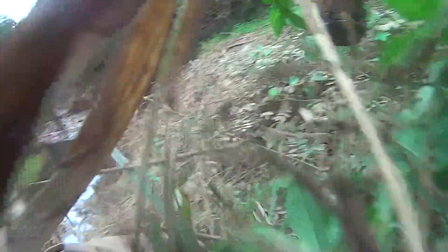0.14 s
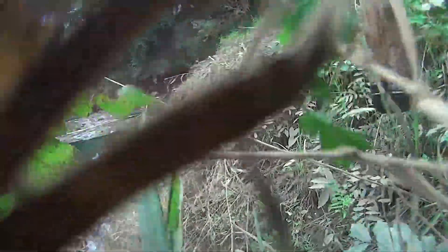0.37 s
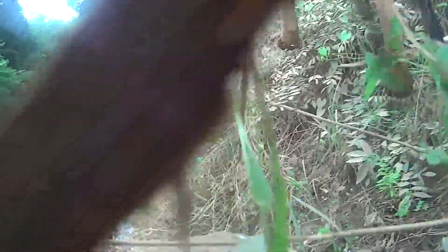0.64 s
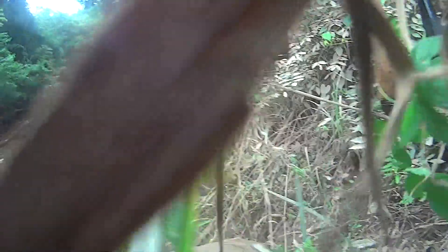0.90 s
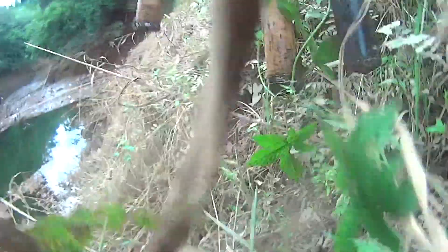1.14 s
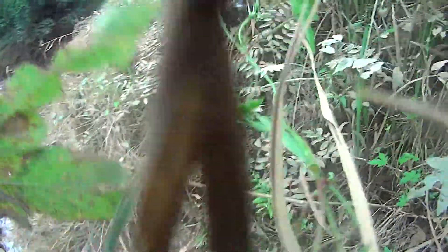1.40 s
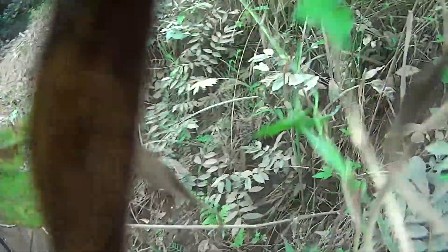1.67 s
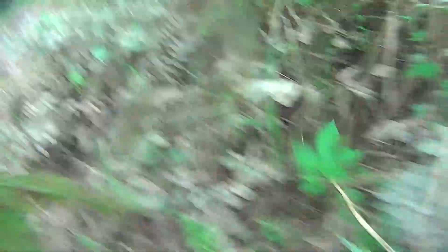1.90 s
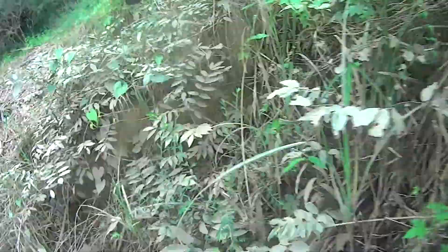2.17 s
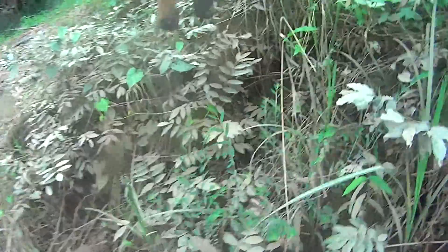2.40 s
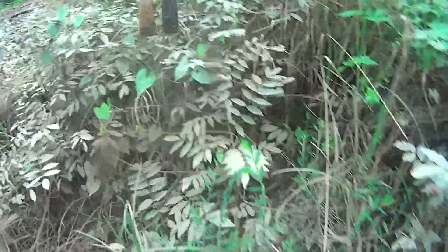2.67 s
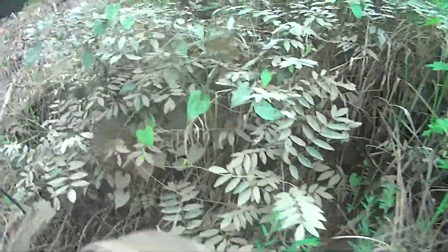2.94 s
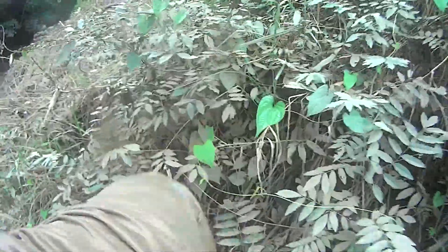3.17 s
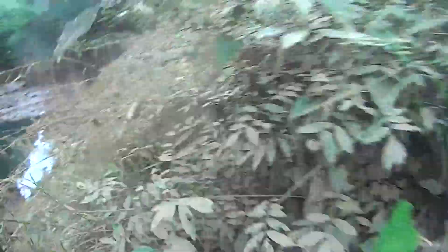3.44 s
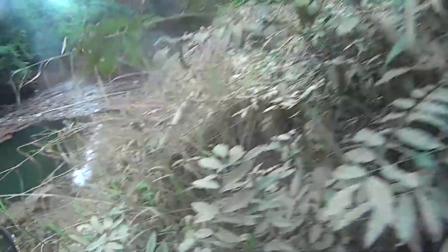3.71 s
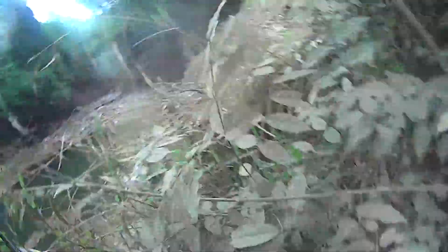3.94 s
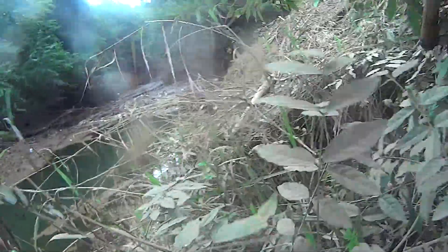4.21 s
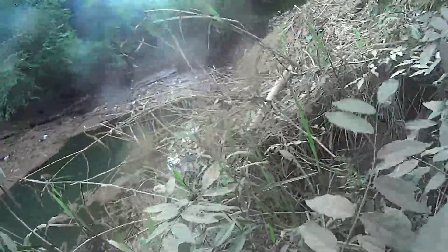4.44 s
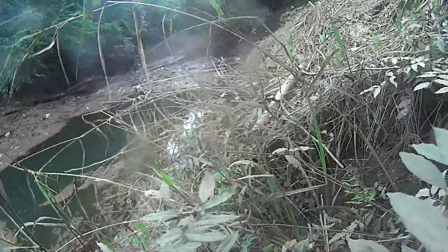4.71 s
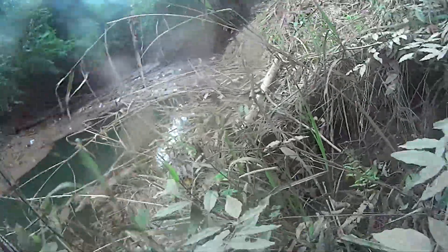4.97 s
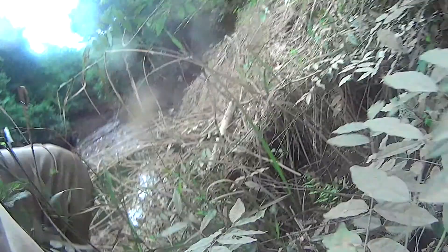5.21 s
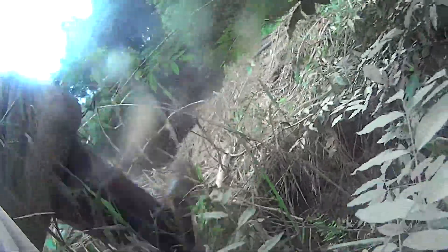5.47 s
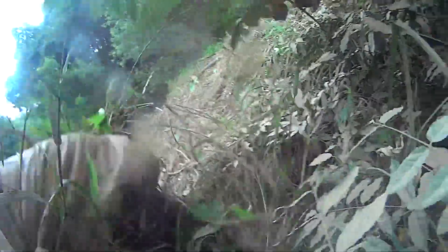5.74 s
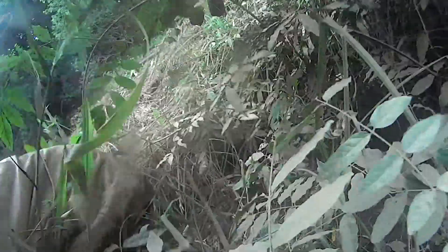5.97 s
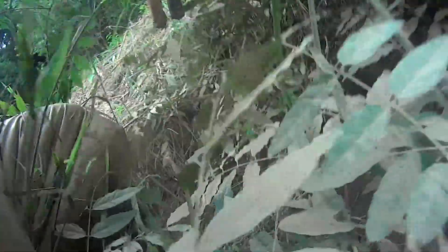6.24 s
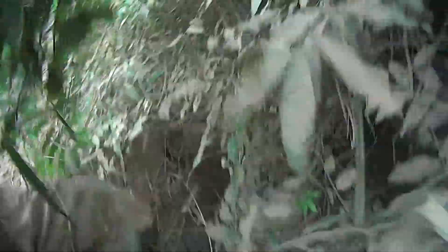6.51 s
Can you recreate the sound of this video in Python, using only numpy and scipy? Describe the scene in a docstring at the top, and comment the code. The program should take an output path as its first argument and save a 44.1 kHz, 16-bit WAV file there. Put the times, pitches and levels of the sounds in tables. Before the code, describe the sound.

Harsh stick-slip scratching of dry stems and leaves directly on a small camera's plastic case, in stereo and slightly overloaded, with cracks and low body jolts. After about three seconds there is a lull, a short burst of scrapes, then mostly quiet microphone hiss with light leaf brushing, isolated dull taps and a thin distant insect. Finally a few crisp scrapes and heavy woody knocks close to the microphones.

```python
"""Dry stalks and leaves drag over the plastic housing of a body-worn camera pushed through undergrowth.
From the start stick-slip jerks drive noise through the housing's modes, over bass thumps of the body's
jolts and a steady hiss. Single snaps strike the modes from half a second on. As the scraping thins near
3 s a faint insect buzzes as a narrow noise band; from 3.5 s twigs knock as short decaying sines.
Each mode reaches the two microphones with its own balance and phase."""
import sys
import numpy as np
from scipy import signal
from scipy.fft import rfft, irfft, next_fast_len
from scipy.io import wavfile
from scipy.ndimage import uniform_filter1d

SR = 44100
rng = np.random.default_rng(int(sys.argv[2]) if len(sys.argv) > 2 else 0)


def master_out(mix):
    """Clip the mix to full scale and print it as 16-bit PCM to the path in sys.argv[1]."""
    frames = np.transpose(np.atleast_2d(mix))
    ceiling = np.clip(frames, -1, 1)
    pcm = np.round(ceiling * 32767).astype(np.int16)
    wavfile.write(sys.argv[1], SR, pcm)


def undo_db(level):
    """Turn decibels back into plain size, where 20 dB means ten times bigger."""
    steps = np.asarray(level, float) / 20
    return 10 ** steps


N = 291940

# housing modes, here and in the functions: pitch_hz, width_hz, level_db, left_over_right_db, left_lead_rad
SHELL_MODES = [(1280, 212, -8, 1, 1.36), (1521, 203, 1.5, -3, 0.17), (1722, 245, -5.5, 1, 0.44)]
BACK_MODES = [(433, 238, 2.5, -1, -1.6), (927, 860, -3.5, 1.5, -1.5)]
PLATE_MODES = [(652, 74, 0, 0, -0.11)]
MOUNT_MODES = [(173, 44, -7, 0.69, -1.8), (223, 77, -1.5, .5, 0.1), (311, 124, -4, 0, -2.5)]


def unit(x):
    """x brought to rms 1 over every eighth of a second."""
    power = uniform_filter1d(x ** 2, SR // 8)
    return x / np.sqrt(power.clip(1e-12))


def curves(rows):
    """One value per sample for each column after the time."""
    s, *columns = np.transpose(rows)
    return [np.interp(np.arange(N) / SR, s, column) for column in columns]


def drift(per_s, depth_db):
    """A slow random gain: per_s random knots a second, joined by straight lines."""
    knots = undo_db(depth_db * rng.standard_normal(200))
    return np.interp(np.arange(N) / SR * per_s, np.arange(200), knots)


def jerks(per_s, spread_db, t60_s):
    """Force envelope of stick-slip: random releases of uneven but bounded size, each dying quickly."""
    draws = rng.random((N // 64, 2))
    waits_s = -np.log(draws[:, 0]) / per_s
    at = (np.cumsum(waits_s) * SR).astype(int)
    sizes = undo_db(-spread_db * np.log(draws[:, 1].clip(.035)))
    force = np.bincount(at.clip(0, N), sizes, N)[:N]
    decay = undo_db(-60 / (t60_s * SR))
    return unit(signal.lfilter([1], [1, -decay], force))


def ring(modes, level_db, slips, glide, taps, own_per_s, apart, puff):
    """Noise under the rubbing force and the taps drive each mode; each microphone hears it at its own phase."""
    size = next_fast_len(N + 8192, True)
    f = np.fft.rfftfreq(size, 1 / SR)
    shapes = []
    for hz, width_hz, db, _, _ in modes:
        resonance = 1j * f * width_hz / (hz * hz - f * f + 1j * f * width_hz)
        shapes.append(undo_db(db) * resonance ** 1.572)
    whole = sum(shapes)
    norm = np.sqrt(np.mean(np.sum(np.abs(shapes) ** 2, 0)))
    level = undo_db(level_db)
    side = np.array([[1], [-1]]) / 2  # left, right

    strike = rfft(taps, size) * norm / np.abs(irfft(whole, size)).max()
    # a snap rattles on for a moment as noise
    after = puff * signal.lfilter([1], [1, -undo_db(-60 / (0.022 * SR))], taps)
    near = level * unit(slips + glide) * rng.standard_normal((2, N))  # rubbing heard separately by each microphone, unrelated left and right
    out = apart * rfft(near, size) * whole
    for shape, (_, _, _, pan_db, lead_rad) in zip(shapes, modes):
        own = jerks(own_per_s, spread_db=2.0, t60_s=0.062)  # each mode is also caught by stalks of its own
        rub = level * unit(slips * (0.09 + own) + glide)
        force = rub * drift(16, depth_db=3.0) + after  # the contact spot wanders
        drive = (rfft(force * rng.standard_normal(N), size) + strike) * shape
        out = out + drive * (undo_db(pan_db * side) * np.exp(1j * lead_rad * side))
    return irfft(out / norm, size)[:, :N]


def rubbing():
    """Pressure and crispness in dB: strokes grip fast, swell or sag and let go; stronger contact sets colour."""
    # strokes of stalks: start_s, length_s, start_pressure_db, swell_to_end_db, crispness_db
    strokes = [(0.0, 0.065, -21, 3.5, 10.5), (0.068, 0.12, -29, 7, 8), (0.138, 0.15, -15.5, -5, 5),
               (0.279, 0.11, -17, -6.5, 3.5), (0.356, 0.11, -18.5, -5, 3), (0.446, 0.068, -14, -8.5, 0.5),
               (0.519, .1, -17.5, 0, 0), (0.621, 0.08, -23, 8, 1.5), (0.696, 0.033, -20, -1.5, -4),
               (0.735, 0.052, -21, -9, -6), (0.782, .085, -49, -11, 3), (0.891, .03, -27.5, -3.5, -3),
               (0.921, 0.026, -18.5, 3.5, 3), (.96, 0.078, -41, 1, -9), (1.022, 0.043, -21.5, -2.5, 1.5),
               (1.077, 0.23, -21, 4.5, 4.5), (1.307, 0.17, -19, 3, -2.5), (1.478, 0.053, -19, -3.5, -4.5),
               (1.541, 0.12, -29, 13.5, 3), (1.671, 0.053, -25, 11.5, 0), (1.73, 0.049, -25, -12, 2),
               (1.76, 0.069, -24, 13.5, 1), (1.838, 0.15, -21.5, 5.5, 1.5), (1.954, .088, -16, 1, -1),
               (2.041, 0.079, -19, 8, -13.5), (2.134, .1, -21, 5.5, -2), (2.252, 0.033, -16.5, 7, -1),
               (2.295, 0.085, -25, 10, 1.5), (2.399, .018, -28.5, 6, -3), (2.43, 0.12, -22.5, 4, 1),
               (2.558, .032, -23.5, 10, 4.5), (2.61, 0.077, -24.5, -1, 2.5), (2.774, 0.11, -25.5, -7, -1.5),
               (3.358, 0.039, -22.5, 0.5, 7), (3.397, .02, -25, -2, -7), (3.417, 0.04, -21.5, 9, 6),
               (3.798, 0.022, -46, -3, -13), (3.842, 0.042, -42.5, 1.5, -11),
               (4.033, 0.071, -39.5, 1.5, -2.5), (5.988, 0.036, -45, 13.5, 7),
               (6.026, 0.041, -30, -7.5, 1.5), (6.078, 0.053, -38, 12, -3.5), (6.14, 0.046, -26.5, -3.5, 3)]
    # light brushing of leaves between the strokes: time_s, pressure_db, crispness_db
    brushing = [(0, -29, 2), (2.66, -44.5, -4.5), (2.71, -60, -13), (2.77, -55, -17), (2.9, -45.5, -4),
                (3.15, -44.5, -7.5), (3.25, -39, -4.5), (3.48, -38, -7), (3.56, -59, -8), (3.76, -54.5, -7),
                (3.8, -44.5, -12), (3.9, -50.5, -4), (3.94, -42, -1), (4.12, -44, -14), (4.2, -49.5, -14),
                (4.41, -60, -2), (4.89, -51.5, -5), (5.26, -38.5, -8.5), (5.45, -45, -6.5), (5.67, -45, 0),
                (5.78, -41, 1.5), (5.89, -42.5, 1.5), (5.97, -44.5, 0), (6.2, -48.5, -11),
                (6.23, -36.5, -9), (6.35, -37.5, -6.5), (6.5, -33.5, -10), (6.62, -43.5, -1.5)]
    grip_s, let_go_db_per_s = 0.002, 1511
    brush_db, brush_crisp_db = curves(brushing)
    power = undo_db(2 * brush_db)
    crisp = brush_crisp_db * power
    for start_s, length_s, db, swell_db, crisp_db in strokes:
        at = round(start_s * SR)
        t = np.arange(round(length_s * SR) + SR // 20) / SR
        swell = swell_db * np.clip(t / length_s, 0, 1)
        release_db = let_go_db_per_s * np.clip(t - length_s, 0, None)
        stroke = (undo_db(db + swell - release_db) * np.clip(t / grip_s, 0, 1)) ** 2
        power[at:at + len(t)] += stroke
        crisp[at:at + len(t)] += crisp_db * stroke
    return 10 * np.log10(power), crisp / power


def body(hz, load_db, follows):
    """Level in dB of a low part tuned near hz: the steady load plus the jolts that lie near its pitch."""
    # steady load of the wearer's body on strap and mount, ahead of each part's scaling: time_s, level_db
    load = [(0, -55), (.25, -40.5), (.75, -40), (.83, -65), (.99, -47), (1.1, -41), (2.1, -36), (2.17, -71),
            (2.37, -55), (2.7, -62), (3.3, -68), (3.55, -64.5), (3.75, -64), (4.2, -59.5), (4.39, -69.5),
            (5.0, -61.5), (5.6, -62.5), (6.62, -50)]
    # jolts of the body: peak_s, peak_db, pitch_hz
    jolts = [(.01, -33, 220), (.16, -38, 199), (.29, -24, 69.6), (.39, -17.5, 138), (.58, -13.5, 125),
             (.68, -23.5, 89.5), (.74, -31, 90), (.92, -36.5, 111), (1.03, -27.5, 122), (1.17, -14.5, 140),
             (1.56, -28.5, 90), (1.67, -23, 55), (1.77, -26.5, 190), (1.83, -22, 130), (1.87, -27.5, 100),
             (1.92, -32, 60), (1.97, -21.5, 149), (2.1, -23, 142), (2.26, -21, 156), (3.37, -54, 220),
             (3.48, -45, 200), (3.56, -55.5, 50), (3.74, -59.5, 45), (3.855, -40, 60), (3.9, -46, 40),
             (4.04, -52, 40), (4.019, -37.5, 210), (4.16, -44.5, 60), (4.43, -53, 220), (5.16, -40.5, 220),
             (5.27, -45.5, 111), (5.42, -48.5, 40), (5.7, -41, 130), (5.77, -49, 199), (5.92, -67, 220),
             (5.95, -45, 49.7), (6.19, -51, 220), (6.42, -33, 180), (6.53, -51, 40.3), (6.61, -36, 220)]
    rise_db_per_s, fall_db_per_s, loss_db_per_octave = 169, 216, 13.5
    t = np.arange(0, N + 64, 64) / SR
    peak_s, peak_db, pitch_hz = np.transpose(jolts)[:, :, None]
    away_db = np.where(t < peak_s, rise_db_per_s * (peak_s - t), fall_db_per_s * (t - peak_s))
    detuned_db = loss_db_per_octave * np.abs(np.log2(pitch_hz / hz))
    jolt_power = undo_db(2 * (peak_db - away_db - detuned_db)).sum(0)
    load_power = undo_db(2 * (follows * curves(load)[0] + load_db))
    return 10 * np.log10(load_power + np.interp(np.arange(N) / SR, t, jolt_power))


def blows():
    """Impulses of the snaps and taps, one row for each group of parts: shell, back, edge, port, mount."""
    # time_s, shell_level_db, then against the shell: brightness_db, weight_db
    snaps = [(0.5515, -9, -6, -10), (0.577, -15, -13, 3.5), (0.598, -40, -5, -8), (0.6287, -13.5, 1.5, -9),
             (0.7036, -15, -9, -15), (0.7496, -10.5, -4.5, -13), (0.8026, -12.5, -10, -32),
             (0.892, -18, -4, -2.5), (0.9077, -23, 3, -17), (0.924, -15, -1.5, 0),
             (1.0266, -8.5, -8.5, -39), (1.074, -12, -10, -21), (1.1096, -14, -5, -22),
             (1.1256, -16, -24, -23), (1.1374, -14.5, 0, -9), (1.1442, -16, -1, -8),
             (1.1581, -13.5, -4, -6), (1.366, -8.5, -25, -14), (1.525, -15, -13.5, -11.5),
             (1.565, -10, -19, -9.5), (1.697, -25, -25, -11), (1.715, -8, -20, -11),
             (1.7887, -11.5, -17, -21.5), (1.811, -21, -21, -14), (1.8946, -5, -24, -30),
             (1.9469, -13, -6, -17), (1.988, -10, -3, -12), (2.0303, -28, -9, -17), (2.074, -7, -28, -28),
             (2.1066, -10, -47, -28), (2.1177, -7, -20, -48), (2.155, -5.5, -21, -45),
             (2.2485, -16, -11, -27), (2.3293, -12.5, 2.5, -19), (2.4021, -22, -12, 1.5),
             (2.4317, -21, -23, -1), (2.6612, -12.5, -7.5, -24.5), (2.729, -38.5, -10, -27),
             (2.7775, -30, 3, -25), (3.3684, -14, -10, -24), (3.4524, -13, -13.5, -21.5),
             (3.6084, -37.5, -26, -20.5), (3.776, -34, -25, -25), (5.2795, -36, -5, -7),
             (5.7596, -24.5, 7, -17), (5.7649, -20.5, -11.5, -21), (5.8115, -30.5, 0, -15.5),
             (5.913, -23.5, -19.5, -24.5), (6.1429, -31, -2.5, -24), (6.1834, -31.5, 1.5, -5),
             (6.226, -21, -15, -12), (6.2355, -30.5, -4.5, -9), (6.2545, -29, -8, -8.5),
             (6.403, -30, -6.5, -7)]
    out = np.zeros((5, N))
    for s, db, bright_db, weight_db in snaps:
        part_db = np.array([0, weight_db, bright_db - 5.0, 1.15 * bright_db - 0.5, weight_db - 5.5])
        out[:, round(s * SR)] = -undo_db(db + part_db)
    return out


def housing():
    """The parts share the jerks; light contact glides, hard contact sticks and slips."""
    # modes of the parts, columns as above
    edge = [(2480, 850, -1, 1.3, 1.88), (2734, 570, -0.5, -0.4, 3.8)]
    rim = [(3164, 200, -0.69, -0.65, 1), (3363, 210, -1.3, .5, 0.096)]
    port = [(4360, 510, -1, -2, 1.5), (5020, 450, 2, -1.5, .3), (5193, 690, -3, -1.5, 0.41)]
    grille = [(5910, 680, -3.5, 2.5, .4), (6840, 1500, -0.5, 4, 2), (7790, 330, -4, -10.5, .3),
              (8530, 87, -2, 2, 2.7), (9010, 640, -4.5, 7.5, 1.9), (10100, 380, -8, -3, 1.7)]
    fastener = [(83, 87, -1.5, 0.72, 0.086), (124, 160, 0.43, 0.61, .2)]
    strap = [(29.3, 10.5, 0, 1.3, .1), (50.3, 59, 0.0039, 0.74, .1)]
    # how the contact lies: time_s, flat_on_wide_faces_db, caught_on_rim_db
    contact = [(0, 9.5, 7), (.11, -3.5, 0), (.44, 7, 1.5), (.55, 2.5, -1), (.66, -0.5, 4.5), (.8, 8, 4.5),
               (.93, 7, -0.5), (1.1, 4, 3.5), (1.21, 2.5, 3), (1.32, -2.5, 0.5), (1.55, 5.5, 3),
               (1.76, 4, 3.5), (1.9, -4.5, -2), (2.1, -11, -2.5), (2.19, 6, 5.5), (2.3, 1, -3),
               (2.45, 0.5, 0), (2.62, -7.5, 4), (2.73, 17.5, -4), (2.85, -9.5, 1.5), (3.0, -0.5, -2),
               (3.42, -11.5, -5), (3.5, 3.5, -12.5), (3.83, 13, -8), (3.95, 0, -12), (4.05, -8, -1.5),
               (4.5, 8.5, 0.5), (5.15, -5, -8), (5.4, 4, -6), (5.6, -1.5, -11), (5.94, 2.5, 4),
               (6.02, 3, 14.5), (6.16, -3, 11), (6.21, 11, 2), (6.32, 0, -11), (6.5, 7, -4), (6.62, -1, -6)]
    rub_db, crisp_db = rubbing()
    flat_db, rim_db = curves(contact)
    glide = np.clip(undo_db(-.6 * (rub_db + 10.0)), .15, 3)
    slips = jerks(per_s=300, spread_db=4.5, t60_s=0.0081)
    drags = 0.7 * slips + 0.67 * jerks(per_s=180, spread_db=3.0, t60_s=0.052)  # adds slower tugs
    shell_hit, back_hit, edge_hit, port_hit, mount_hit = blows()

    out = ring(SHELL_MODES, rub_db - 3.0, drags, glide, 0.79 * shell_hit,
               own_per_s=60, apart=0.25, puff=1.0)
    out += ring(BACK_MODES, rub_db - 9.5 + 0.62 * flat_db, drags, glide, 2.4 * back_hit,
                own_per_s=44, apart=0.41, puff=0.64)
    out += ring(PLATE_MODES, 1.226 * rub_db - 10.5 + 0.94 * flat_db, drags, glide, 0.78 * back_hit,
                own_per_s=38, apart=0.063, puff=0.65)
    out += ring(edge, rub_db - 13 + 0.1 * crisp_db, slips, glide, 1.0 * edge_hit,
                own_per_s=100, apart=0.77, puff=1.5)
    out += ring(rim, rub_db - 14.5 + 0.32 * crisp_db + rim_db, slips, glide, 0.77 * edge_hit,
                own_per_s=60, apart=0.44, puff=1.0)
    out += ring(port, rub_db - 11.5 + crisp_db, slips, glide, 0.87 * port_hit,
                own_per_s=24, apart=0.46, puff=0.73)
    out += ring(grille, 0.89 * rub_db - 19.5 + 0.87 * crisp_db, slips, glide, 0.92 * port_hit,
                own_per_s=75, apart=0.48, puff=0.59)
    out += ring(MOUNT_MODES, body(hz=209, load_db=5, follows=0.98), drags, 0.29 * glide, 1.2 * mount_hit,
                own_per_s=30, apart=0.63, puff=0.79)
    out += ring(fastener, body(hz=100, load_db=10, follows=1.27), drags, 0.7 * glide, 0.3 * mount_hit,
                own_per_s=45, apart=0.4, puff=1.0)
    out += ring(strap, body(hz=42, load_db=-7, follows=0.86), 2.3 * slips, glide, 0.1 * mount_hit,
                own_per_s=7, apart=0.4, puff=0.8)
    return out


def hiss():
    """The microphones' own noise, white and unrelated left and right."""
    return undo_db(-58) * rng.standard_normal((2, N))


def insect():
    """A far insect's buzz: noise through one narrow mode, nearly steady but for its level curve."""
    # time_s, level_db
    levels = [(2.88, -90), (2.95, -81), (3.34, -56), (3.5, -81), (4.7, -82), (4.85, -69.5), (5.3, -67),
              (5.7, -70), (6.62, -70)]
    # the note: pitch_hz, width_hz, level_db, left_over_right_db, left_lead_rad
    song = [(4190, 40, 0, 5.5, 0.95)]
    (level_db,) = curves(levels)
    return ring(song, level_db, np.ones(N), 6, np.zeros(N), own_per_s=24, apart=0.55, puff=0)


def knocks():
    """A twig's blunt blow rings only low modes, cleanly, each rising in about a cycle and dying by its width."""
    # time_s, level_db, best_rung_pitch_hz, loss_away_db_per_octave
    twigs = [(3.5297, -17, 1110, 6.5), (3.784, -24.5, 1540, 23.5), (3.9614, -20, 223, 9),
             (3.976, -21, 223, 9), (4.0012, -14, 230, 6.5), (4.018, -42, 223, 11), (4.0988, -16, 1120, 3.5),
             (5.1174, -27, 260, 6), (5.2054, -28, 260, 14), (5.2785, -13.5, 1130, 17),
             (5.4494, -34, 440, 5), (6.2333, -17.5, 700, 5), (6.2548, -14, 1300, 7),
             (6.3875, -17, 1520, 16), (6.4018, -12.5, 1110, 8), (6.4519, -3, 306, 10),
             (6.4587, -12, 237, 16)]
    out = np.zeros((2, N + SR))
    t = np.arange(SR // 8) / SR
    side = np.array([[1], [-1]]) / 2  # left, right
    struck = SHELL_MODES[:2] + BACK_MODES + PLATE_MODES + MOUNT_MODES[1:]
    for s, level_db, best_hz, loss_db in twigs:
        at = round(s * SR)
        for hz, width_hz, _, pan_db, lead_rad in struck:
            db = level_db - loss_db * abs(np.log2(hz / best_hz))
            hz = hz * rng.normal(1, 0.06)  # no two blows ring quite the same pitch
            fade = np.exp(-np.pi * np.clip(width_hz, 70, 140) * t)
            rise = 1 - np.exp(-1.5 * hz * t)
            tone = np.sin(2 * np.pi * hz * t + 0.5 * lead_rad * side)
            out[:, at:at + len(t)] += undo_db(db + pan_db * side) * fade * rise * tone
    return out[:, :N]


def scene():
    """The sum of the rubbed and struck housing, the microphone hiss, the insect and the twigs."""
    return housing() + hiss() + insect() + knocks()


def low_pass(x):
    """Removes everything above the highest recorded frequency."""
    return signal.sosfilt(signal.butter(12, 11910, fs=SR, output="sos"), x)


def record(dry):
    """The camera rounds off loud peaks and keeps nothing above its band limit."""
    top_hz = 11050
    soft = dry / (1 + np.abs(dry / 0.75) ** 4) ** (1 / 4)
    size = next_fast_len(N + 8192)
    passed = np.fft.rfftfreq(size, 1 / SR) < top_hz
    mix = irfft(rfft(soft, size) * passed, size)[:, :N]
    return low_pass(mix)


dry = scene()
out = record(dry)
master_out(out)
```